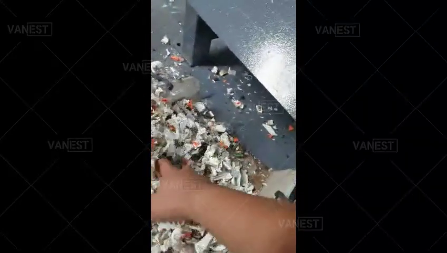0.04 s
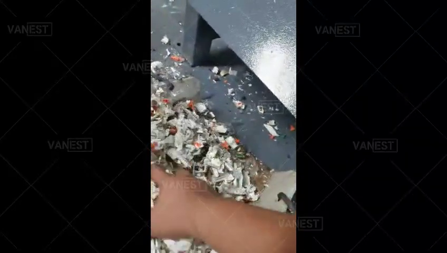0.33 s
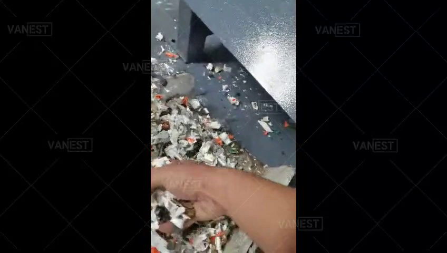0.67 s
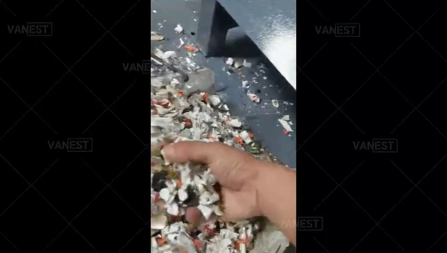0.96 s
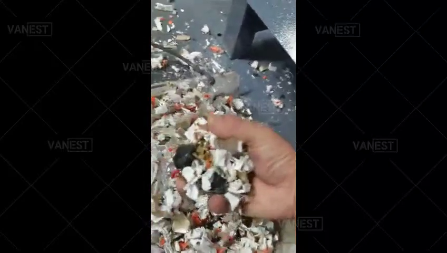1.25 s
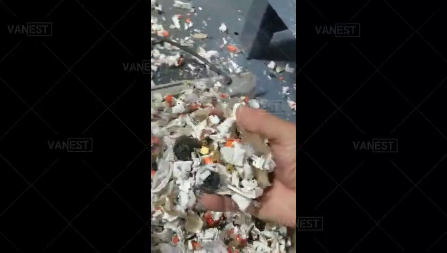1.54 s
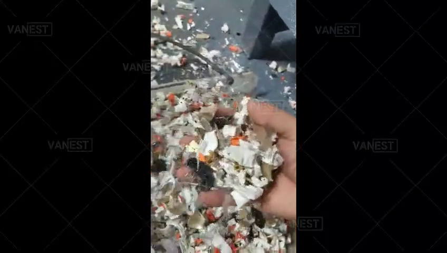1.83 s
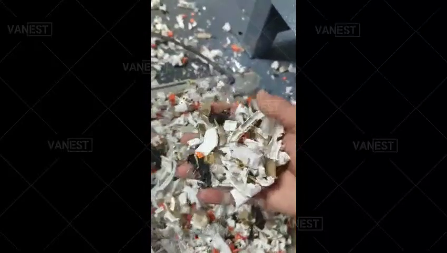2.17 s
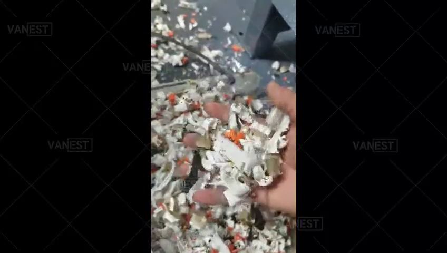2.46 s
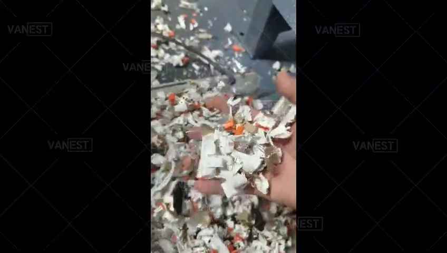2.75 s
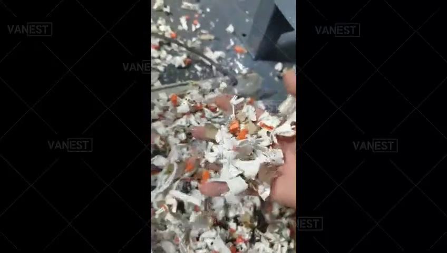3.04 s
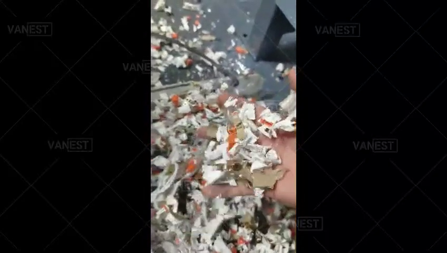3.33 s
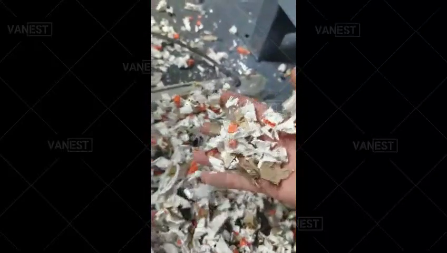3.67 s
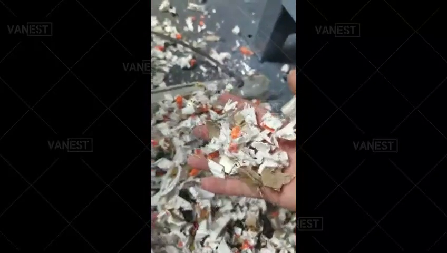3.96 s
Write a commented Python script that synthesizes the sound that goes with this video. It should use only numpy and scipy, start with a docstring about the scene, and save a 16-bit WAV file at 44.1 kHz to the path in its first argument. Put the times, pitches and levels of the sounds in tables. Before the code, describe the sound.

A shredder squeals and scrapes close by in a workshop, its scrap hissing against steel over a low hum. The wavering squeal comes and goes, peaks in a sharp shriek midway, then briefly jumps higher.

```python
"""A shredder hums and rumbles in a workshop, close by, while a hand sifts the shredded chips.
From the start, scrap rubbing on steel scrapes, hisses and shrieks; nearby surfaces add short echoes.
At 0.3 s a high, wavering squeal joins in and comes and goes until the end. The loudest shriek falls
at 1.9 s, then the squeal jumps higher for a while and the scrap slides fast enough to sizzle.
Just after 3 s a chip clicks in the hand and the housing groans under load; the rumble runs on."""
import sys
import numpy as np
from scipy import signal
from scipy.fft import rfft, irfft
from scipy.io import wavfile

SR = 44100
rng = np.random.default_rng(int(sys.argv[2]) if len(sys.argv) > 2 else 0)


def wav_out(sig):
    """Save sig, one row per channel (or a flat mono array), as 16-bit PCM at SR to the path in sys.argv[1]."""
    wavfile.write(sys.argv[1], SR, np.round(np.clip(np.atleast_2d(sig).T, -1, 1) * 32767).astype(np.int16))


N = 176400  # 4 seconds
T = np.arange(N) / SR


# The path of the squeal, one list per stretch: (time [s], pitch [Hz], level [dB])
SQUEAL_PATHS = [
    [(.33, 5000, -37), (.41, 4520, -39), (.465, 4720, -26), (.515, 4480, -45), (.565, 4630, -28.5),
     (.595, 4400, -42)],
    [(.775, 3910, -36), (.8, 4410, -38.5), (.825, 4630, -29), (.855, 4380, -28), (.89, 3900, -30),
     (.92, 3963, -26), (.96, 3726, -34.5), (1.018, 3800, -34), (1.032, 3976, -26), (1.13, 4013, -29.5),
     (1.16, 3900, -36.5), (1.235, 3710, -33.5), (1.275, 4160, -48), (1.4, 3400, -37)],
    [(1.455, 4390, -28), (1.49, 4615, -26), (1.524, 4530, -18), (1.543, 4430, -26), (1.555, 4510, -25.5),
     (1.586, 4536, -20), (1.615, 4670, -43)],
    [(1.625, 4610, -34), (1.66, 4590, -38), (1.73, 4420, -32), (1.79, 4170, -34), (1.835, 4120, -26.5),
     (1.865, 4150, -31), (1.89, 4560, -27), (1.93, 4500, -53)],
    [(2.07, 5720, -41), (2.12, 5850, -37.5), (2.145, 6700, -41), (2.19, 6790, -33), (2.24, 6590, -26.5),
     (2.32, 6600, -29.5), (2.36, 6080, -25), (2.4, 6300, -28), (2.44, 6870, -32), (2.5, 6900, -28),
     (2.54, 6170, -29.5), (2.72, 6180, -50)],
    [(2.76, 5020, -44), (2.85, 5075, -32.5), (2.88, 4070, -32), (2.99, 4290, -29.5), (3.025, 3930, -30),
     (3.08, 4070, -35), (3.108, 3324, -24), (3.13, 4155, -31), (3.184, 4034, -29), (3.208, 3290, -29),
     (3.25, 4230, -32.5), (3.285, 3730, -42.5), (3.41, 3430, -42)],
    [(3.448, 3920, -33), (3.485, 4363, -25), (3.55, 4050, -27.5), (3.59, 4106, -25), (3.625, 4330, -32),
     (3.665, 4010, -28.5), (3.725, 4270, -30.5), (3.79, 3980, -29), (3.81, 3570, -29), (3.832, 3510, -22),
     (3.855, 3890, -29), (3.874, 4850, -26.5), (3.897, 3750, -30), (3.91, 3044, -22.5), (3.923, 3990, -33),
     (3.945, 3050, -31)],
]
# How each stretch sounds: (left over right [dB], added octave [dB], roughness [0-1])
SQUEAL_TONES = [(8, -17, 0.3), (4, -2.5, 0.21), (16, -4, 0), (8.5, -12, 0.11), (0.5, -7.5, 0.41),
                (4.5, -7, 0.54), (4, -9, 0.12)]

def squeal():
    """Scrap rubbing on steel sings. A rough grip shakes the tone; a lost grip makes it dip briefly."""
    out = np.zeros((2, N), complex)
    waver = 1 + .009 * wobble(90)
    shake, chatter = wobble(780), wobble(630)
    lost_grip = np.clip(wobble(110) - .5, 0, 1)
    flutter_db = 2.8 * np.array([wobble(90), wobble(90)]) - 11 * lost_grip
    for path, (side_db, octave_db, rough) in zip(SQUEAL_PATHS, SQUEAL_TONES):
        level = gain(curve(path, column=2) + 1.5) * fade(path[0][0], path[-1][0], .012, .0047)
        on = level > 0
        hz = curve(path) * (waver + rough * .033 * shake)
        wave = tone(hz[on])
        voice = wave + wave ** 2 * gain(octave_db)  # squaring doubles the pitch
        out[:, on] += voice * level[on] * unit(1 + rough * chatter[on]) * pan(side_db)
    return microphone(out * gain(flutter_db))


# Short shrieks: (start [s], length [s], first pitch [Hz], last pitch [Hz], level [dB],
# left over right [dB], roughness [0 smooth, 1 or more fully rough])
SHRIEK_EVENTS = [ (0.02, 0.046, 8200, 8170, -18.5, 3, 0), (.01, 0.07, 2720, 2700, -33.5, 3, 0.24),
                 (0.0725, 0.02, 8100, 7990, -17, -4, 0.3), (0.173, 0.0088, 7840, 8020, -22, -7, 0.54),
                 (.2, .18, 2726, 2790, -35, 3.5, 0.77), (0.278, 0.051, 8880, 8720, -22.5, 11, 0.1),
                 (0.37, 0.14, 2840, 2785, -20.5, 7, 0), (.385, 0.12, 8400, 8560, -19.5, 2.5, 0.16),
                 (0.527, 0.093, 6220, 6020, -28, 3, 0.5), (0.619, 0.065, 2576, 2720, -34, 5, 0.44),
                 (0.634, 0.025, 9400, 9450, -19, 16, 0.9), (0.721, 0.026, 8250, 7960, -17, -3, 0.1),
                 (.21, 0.13, 6920, 6800, -31.5, -8, 0.45), (0.845, 0.18, 6840, 6840, -37.5, -4, 0),
                 (1.132, 0.11, 7570, 7600, -25, -2, 0.23), (1.697, 0.055, 6275, 6240, -27, -4, 0.28),
                 (1.859, 0.048, 9900, 9560, -27, 5, 1), (1.875, 0.041, 8860, 9100, -21.5, 17, 0.4),
                 (1.9, .032, 8810, 8670, -12, 17, 0.08), (1.933, 0.02, 9500, 9600, -23.5, 8, 0.8),
                 (2.011, 0.038, 9630, 9650, -21, 11, 1.2), (2.436, 0.4, 10270, 10260, -32, -1, 0.54),
                 (2.407, 0.045, 7410, 7400, -25, -4, 0.6), (2.532, 0.075, 5110, 4420, -38, 4, 1.1),
                 (2.62, .11, 3530, 3700, -39, 0, 1.17), (2.877, 0.34, 8300, 9000, -27, 1, 0.57),
                 (3.229, 0.1, 10120, 10920, -30.5, 7, 0.8), (3.576, 0.063, 6730, 6790, -30.5, -6, 0.1),
                 (3.817, 0.15, 6620, 5770, -37.5, 5, 0.2), (3.901, 0.029, 8340, 8240, -27.5, -5, .3)]
LOW_NOTE_HZ = 4000  # divides the steel's low notes from its high ones

def shrieks():
    """One note of the steel takes over for a moment, and chatters if the contact slips."""
    out = np.zeros((2, N), complex)
    jitter = 1 + .0045 * wobble(96)
    chatter = unit(wobble(630) + 1j * wobble(630))
    for start, length, from_hz, to_hz, db, side_db, rough in SHRIEK_EVENTS:
        end = start + length
        level = gain(db + 3) * fade(start, end, .001 + .12 * length, .01 + .026 * length)
        on = level > 0
        rough = min(rough, 1)
        grip = np.sqrt(1 - rough ** 2) + rough * np.roll(chatter, rng.integers(N))[on]
        wave = tone(np.interp(T[on], [start, end], [from_hz, to_hz]) * jitter[on])
        octave = wave ** 2 * gain(-18.5) * (from_hz < LOW_NOTE_HZ)
        out[:, on] += (wave + octave) * level[on] * grip * pan(side_db)
    return microphone(out)


# How hard the scrap scrapes: (time [s], level [dB])
SCRAPE_LEVELS = [(0, -22.5), (.05, -22.5), (.075, -28), (.17, -30), (.3, -18.5), (.38, -20.5), (.43, -35),
                 (.54, -21), (.6, -25.5), (.65, -20), (.72, -21.5), (.77, -32), (.9, -37), (1.18, -32),
                 (1.36, -30.5), (1.44, -37), (1.57, -28.5), (1.75, -36.5), (1.88, -32), (1.99, -36.5),
                 (2.04, -27.5), (2.09, -40.5), (2.17, -39.5), (2.25, -28.5), (2.35, -41), (2.43, -28.5),
                 (2.7, -23.5), (2.79, -36), (2.92, -33), (3.0, -44), (3.12, -28.5), (3.3, -32),
                 (3.44, -41.5), (3.55, -38.5), (3.74, -43), (3.89, -35), (4, -43)]
# The notes the steel rings at: (pitch [Hz], rough width [Hz], level [dB])
STEEL_NOTES = [(2702, 1000, -7.5), (3490, 1800, -12.5), (5975, 950, -9.5), (7100, 436, -17),
               (7900, 1900, 5), (8770, 280, 7), (9536, 290, 2), (10820, 1100, -6), (13600, 2400, -17.5)]
SCRAP_LEFT_DB = 3.5  # the scrap is a little to the left

def scrape(slips_per_s=2300):
    """Scrap sticks and slips. Each slip rings the steel, whose notes swell and drift on their own."""
    slips = (rng.random(N) < slips_per_s / SR) * rng.choice([-1, 1], N)
    steel = 0
    for hz, width, db in STEEL_NOTES:
        note = unit(ring(ring(slips, hz, .5 * width), hz, 2 * width))
        drift = tone(hz * .018 * wobble(28))  # multiplying by this nudges the pitch
        steel = steel + note * drift * gain(db + 2.2 * wobble(50))
    return microphone(unit(steel) * gain(curve(SCRAPE_LEVELS) + .5) * pan(SCRAP_LEFT_DB))


def squeaks(per_s=100, average_s=.035, max_glide=.05):
    """Within the scraping, single scraps catch and sing near a high steel note, gliding up or down."""
    out = np.zeros((2, N))
    high_notes = [note for note in STEEL_NOTES if note[0] > LOW_NOTE_HZ]
    for start, pick, size, detune, glide, place in rng.random((int(per_s * N / SR), 6)):
        hz, width, db = high_notes[int(pick * len(high_notes))]
        end = min(N, int(start * N + average_s * (.5 + size) * SR))
        on = np.arange(int(start * N), end)
        age = np.linspace(0, 1, len(on))
        pitch = (hz + width * (detune - .5)) * (1 + max_glide * (2 * glide - 1) * age)
        left_lead = np.array([[place / 2], [0]])  # each comes from its own place
        cycles = np.cumsum(pitch) / SR + left_lead
        out[:, on] += gain(db / 2) * np.sin(np.pi * age) * np.cos(2 * np.pi * cycles)
    return out * gain(curve(SCRAPE_LEVELS) - 2) * pan(SCRAP_LEFT_DB)


# How loud the sliding scrap is: (time [s], level [dB])
HISS_LEVELS = [(0, -52), (.14, -30), (.32, -29), (.5, -30.5), (.7, -23), (.85, -32), (1.2, -26.5),
               (1.42, -47), (1.87, -28.5), (2.1, -42), (2.25, -28), (2.5, -28.5), (2.8, -26.5), (3.2, -24),
               (3.42, -30.5), (3.75, -47), (3.9, -30), (4, -56)]
# Its mix of low and high sound: (frequency [Hz], level [dB])
HISS_SHAPE = [(2000, 3.5), (3500, 4.5), (5000, 12.5), (6500, 15), (10300, 22), (11800, 10.5), (16000, -5)]
# Chips clicking in the hand: (time [s], level [dB])
CHIP_CLICKS = [(1.571, -44), (3.082, -31)]
# When the scrap slides fastest: (start [s], end [s], level [dB])
FAST_SLIDES = [(0.245, .76, -39), (2.3, 3.264, -32)]
# The thin sizzle it makes then: (frequency [Hz], level [dB])
SIZZLE_SHAPE = [(10500, -43), (13000, -1), (15500, 5)]

def hiss_and_clicks(click_decay_s=.013):
    """Scrap hisses as it slides over steel and sizzles when fast; two chips click in the hand."""
    hiss = noise(HISS_SHAPE, (2, N))
    level = gain(curve(HISS_LEVELS) - 5.5 + wobble(53))
    for at, db in CHIP_CLICKS:
        level += gain(db) * (T >= at) * np.exp(-np.abs(T - at) / click_decay_s)
    fast = sum(gain(db) * fade(start, end, .1, .1) for start, end, db in FAST_SLIDES)
    sizzle = noise(SIZZLE_SHAPE, (2, N)) * fast
    return (hiss * level + sizzle) * pan(SCRAP_LEFT_DB)


# The notes the housing hums at: (pitch [Hz], width [Hz], level [dB])
HUM_NOTES = [(220.5, 13.4, -45.5), (195.4, 29, -51), (285.1, 31, -48.5)]
# Its groan under load: (start [s], end [s], pitch [Hz], width [Hz], level [dB])
HOUSING_GROAN = (3.12, 3.28, 415, 45, -39)
# The deep rumble of machine and workshop: (frequency [Hz], level [dB])
RUMBLE_SHAPE = [(20, -50), (43, -44), (81, -7), (141, -11), (209, -3.5), (249, -6.5), (310, -11.5),
                (400, -12), (520, -18.5), (880, -120)]
# How the rumble swells, and the hum with it: (time [s], level [dB])
RUMBLE_LEVELS = [(0, -41), (.7, -41.5), (1.2, -37), (2.0, -38), (2.4, -41), (2.8, -36), (4, -35.5)]
# The sound of the load churning inside: (frequency [Hz], level [dB])
CHURN_SHAPE = [(200, -19), (350, 5), (550, 4.5), (750, 6.5), (1000, 6), (1400, -0.5), (2000, 2.5),
               (3000, -10), (6000, -4), (12000, -52)]
# How loud the churning is: (time [s], level [dB])
CHURN_LEVELS = [(0, -47.5), (.8, -45), (1.2, -38.5), (1.7, -42), (1.8, -38.5), (1.93, -43.5), (2.0, -40),
                (2.4, -41.5), (2.77, -41.5), (2.85, -40.5), (4, -40)]

def machine():
    """The housing hums and groans once, over a low rumble and the churning of the load."""
    def housing_note(hz, width, db):
        shaking = rng.standard_normal(N)
        return gain(db) * unit(ring(ring(shaking, hz, width), hz, width).real)

    start, end, *note = HOUSING_GROAN
    groan = housing_note(*note) * fade(start, end, end - start, (end - start) / 2)
    swell = gain(curve(RUMBLE_LEVELS))
    hum = stereo(lambda: sum(housing_note(*row) for row in HUM_NOTES), spread=.29) * unit(swell)
    rumble = stereo(lambda: noise(RUMBLE_SHAPE), spread=.052) * swell
    churn = stereo(lambda: noise(CHURN_SHAPE), spread=.86)
    churn *= gain(curve(CHURN_LEVELS) + .5 + wobble(10.6))
    return hum * gain(1) + groan + rumble * gain(-3.5) + churn * pan(-2.5)


def echoes(sound, die_away_s=.16, db=-10):
    """Nearby surfaces throw the sound back as a quickly fading cloud, different on each side."""
    t = T[:SR // 2]
    tail = rng.standard_normal((2, len(t))) * gain(-60 * t / die_away_s)
    tail /= np.sqrt(np.sum(tail ** 2, axis=1, keepdims=True))
    return gain(db) * signal.fftconvolve(sound, tail, axes=1)[:, :N]


def gain(db):
    """Turn decibels into a number to multiply by."""
    return 10 ** (np.asarray(db) / 20)


def unit(x):
    """Scale a signal to an average strength (rms) of 1."""
    return x / np.sqrt(np.mean(np.abs(x) ** 2))


def curve(rows, column=1):
    """Join a table's points with straight lines over time."""
    rows = np.array(rows, float)
    return np.interp(T, rows[:, 0], rows[:, column])


def fade(start, end, rise_s, fall_s):
    """Fade in around start, hold, and fade out around end."""
    return np.clip((T - start) / rise_s + .5, 0, 1) * np.clip((end - T) / fall_s + .5, 0, 1)


def wobble(rate):
    """A smooth random wiggle of strength 1 that changes about rate times a second."""
    f = np.fft.rfftfreq(N, 1 / SR)
    return unit(irfft(rfft(rng.standard_normal(N)) / (1 + (2 * f / rate) ** 4), N))


def noise(shape, size=N):
    """Noise of strength 1, with its lows and highs set by a table."""
    hz, db = np.array(shape, float).T
    f = np.fft.rfftfreq(N, 1 / SR) + 1e-3
    weights = gain(np.interp(np.log(f), np.log(hz), db))
    return unit(irfft(rfft(rng.standard_normal(size)) * weights, N))


def tone(hz):
    """A pure tone that follows a pitch; complex numbers make its wave easy to shift."""
    return np.exp(2j * np.pi * np.cumsum(hz) / SR)


def ring(x, hz, width):
    """Let x ring at one pitch; a smaller width rings longer."""
    pole = np.exp((2j * np.pi * hz - np.pi * width) / SR)
    return signal.lfilter([1 - abs(pole)], [1, -pole], x)


def pan(db):
    """Lean left (positive dB) or right, keeping the total power."""
    sides = gain(np.array([[db], [-db]]) / 2)
    return unit(sides)


def stereo(make, spread):
    """One noise for both sides, plus a second added on the left and subtracted on the right."""
    return make() + spread * make() * np.array([[1], [-1]])


def microphone(wave, gap_radians=1.73):
    """A wave reaches the microphone's two openings at different points in its cycle."""
    return np.sqrt(2) * np.real(wave * np.exp(.5j * gap_radians * np.array([[1], [-1]])))


def scene():
    """The rubbing sounds and their echoes, over the running machine."""
    rubbing = squeal() + shrieks() + scrape() + squeaks() + hiss_and_clicks()
    return rubbing + echoes(rubbing) + machine()


def record(dry, top_hz=15900):
    """Cut away the very highest treble."""
    return signal.sosfilt(signal.ellip(10, .2, 80, top_hz, fs=SR, output="sos"), dry)


dry = scene()
out = record(dry)
wav_out(out)
```